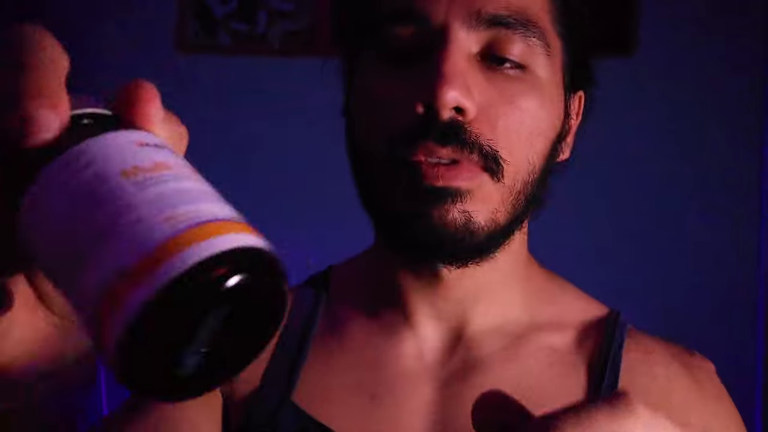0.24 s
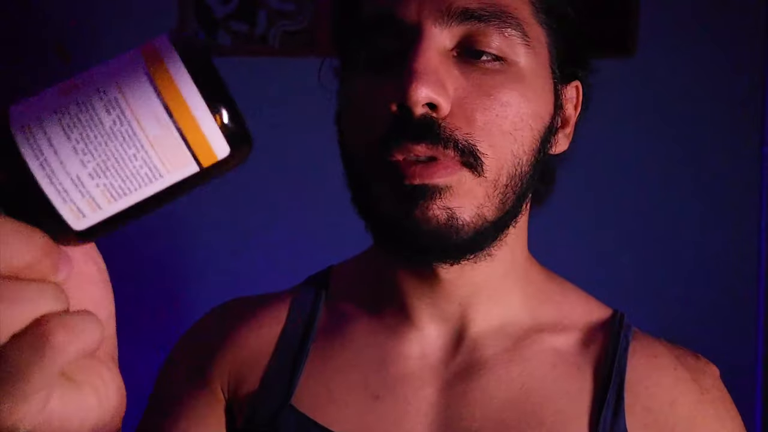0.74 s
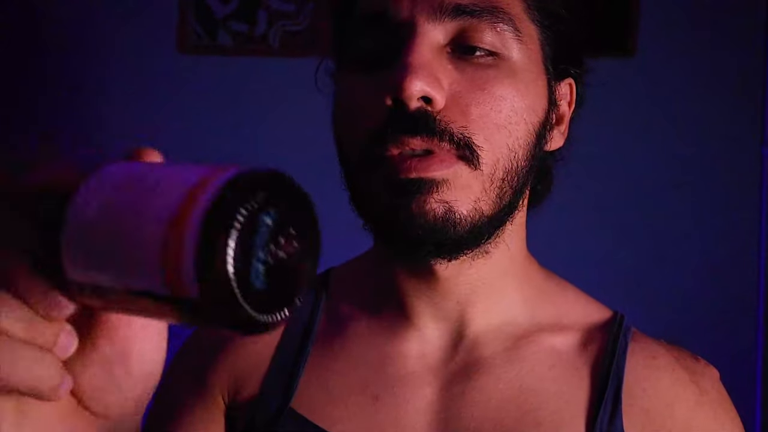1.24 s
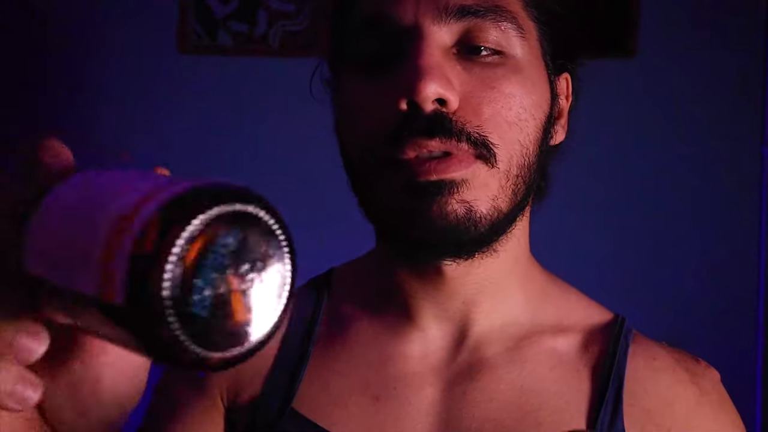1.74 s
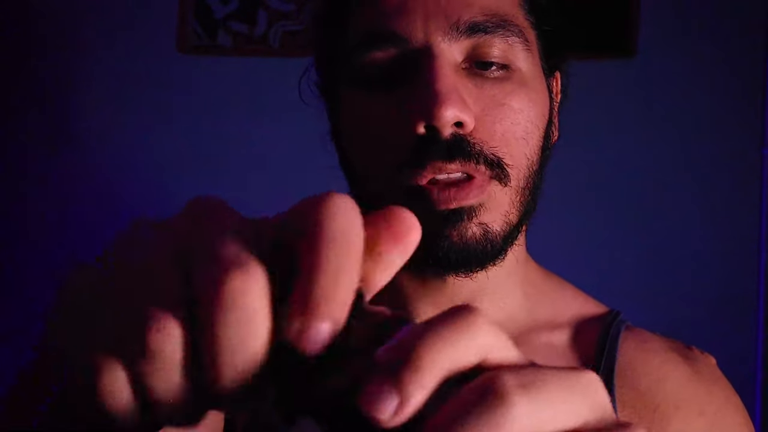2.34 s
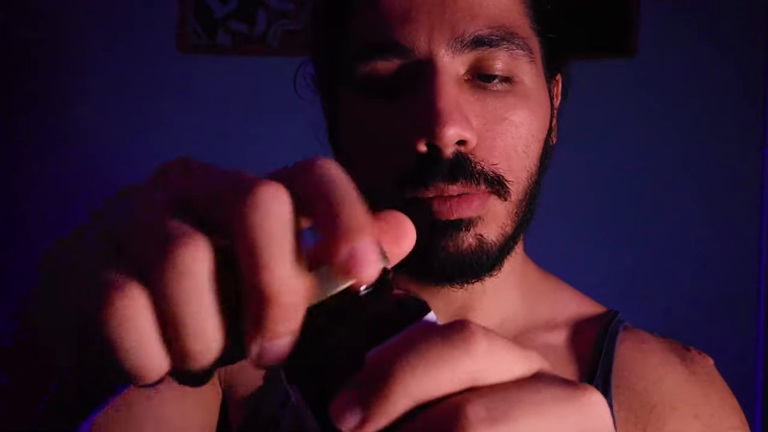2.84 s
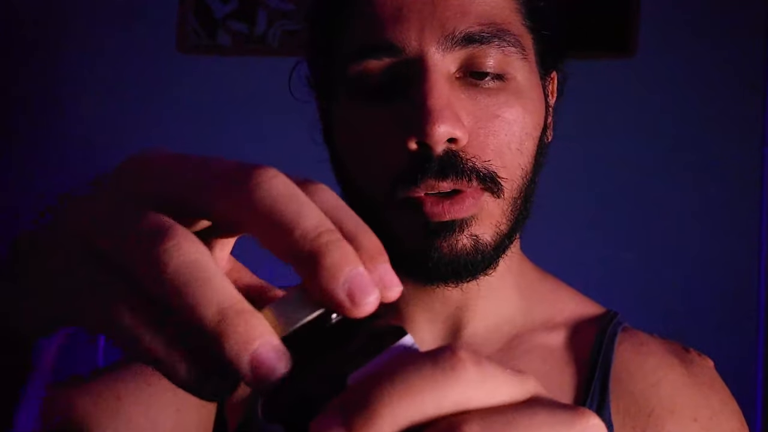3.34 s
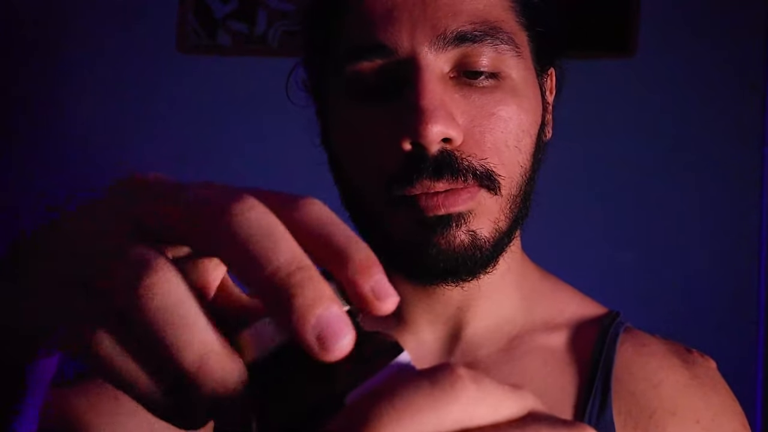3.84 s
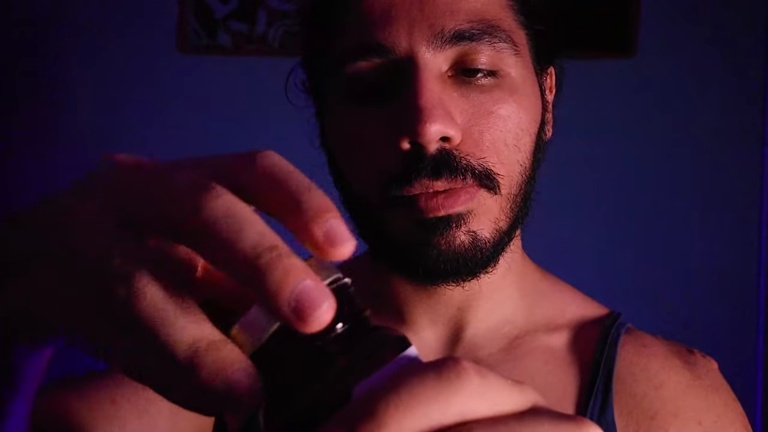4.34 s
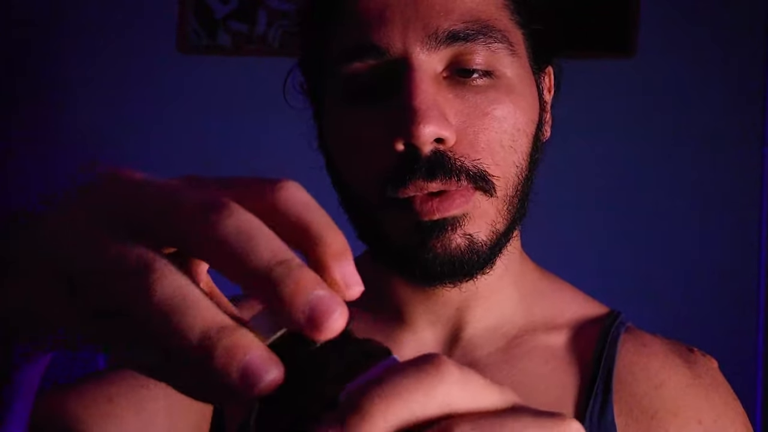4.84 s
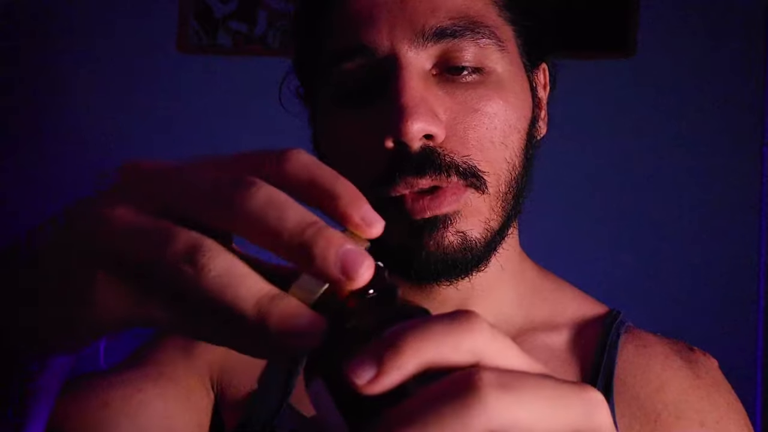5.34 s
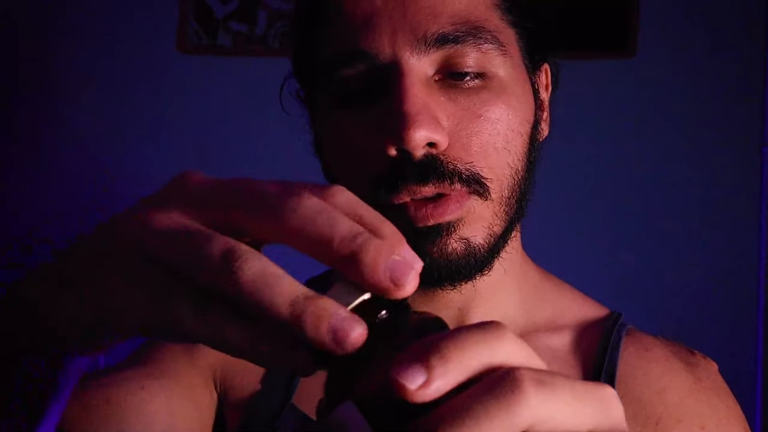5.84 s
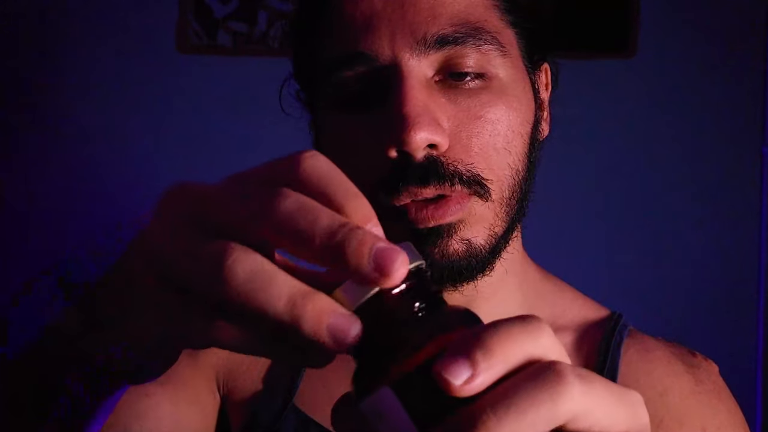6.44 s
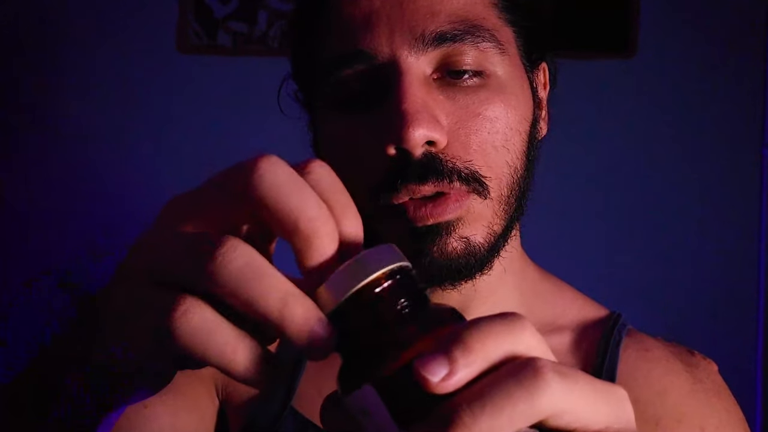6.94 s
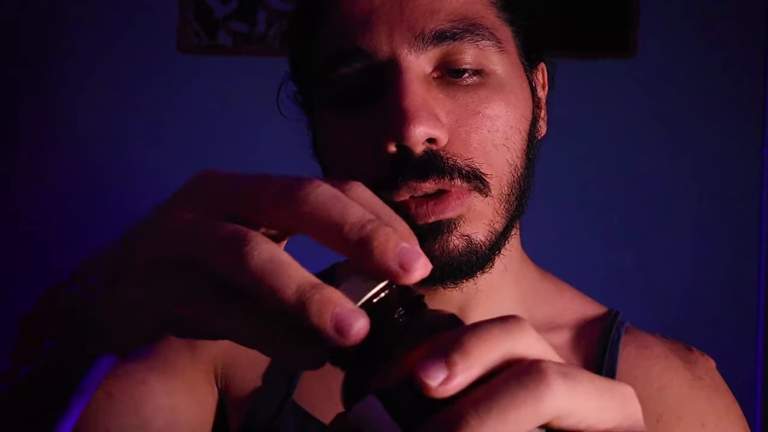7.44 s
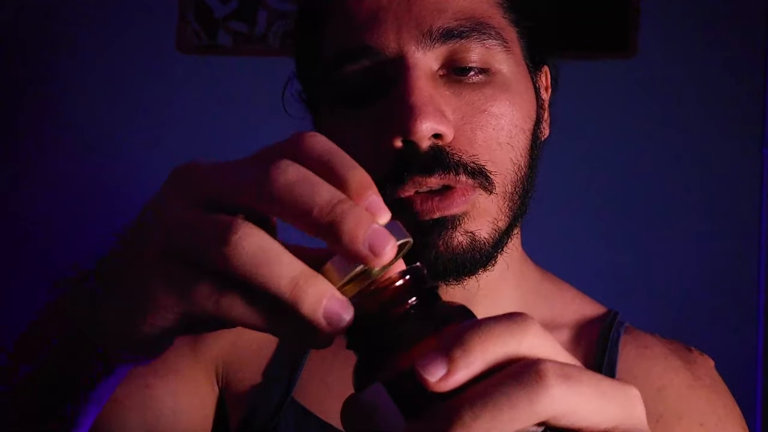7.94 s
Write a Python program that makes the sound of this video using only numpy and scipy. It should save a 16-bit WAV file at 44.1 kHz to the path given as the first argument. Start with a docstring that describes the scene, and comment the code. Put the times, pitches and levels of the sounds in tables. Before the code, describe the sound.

Close stereo handling of a glass pill bottle: crisp tumbling rattle, then gritty unscrewing scrapes, sharp metallic clicks and small hollow neck notes.

```python
"""In a small quiet room a glass pill bottle is tipped to and fro, close to a stereo microphone.
First pills tumble and strike the glass and the closed lid: noise cracks and decaying modes, over soft handling.
Then the metal cap is unscrewed: random catches grind, rasp and hiss on the thread, and clicks thud, clack and ring.
As the cap comes loose its sounds stir a gliding air resonance in the neck, and puffs of air add short sine notes.
Near echoes and scattered room reflections follow each sound; a faint noise floor lies under all of it."""
import sys
import numpy as np
from scipy import signal
from scipy.fft import rfft, irfft
from scipy.io import wavfile
from scipy.ndimage import uniform_filter1d

SR = 44100
rng = np.random.default_rng(int(sys.argv[2]) if len(sys.argv) > 2 else 0)


def to_wav(sig):
    """Store sig (one row per channel, or 1-D mono) as 16-bit WAV at the path in sys.argv[1].

    Samples outside -1..1 are clipped; the rate is SR.
    """
    pcm = np.clip(np.atleast_2d(sig), -1, 1) * 32767
    pcm = np.round(pcm).astype(np.int16)
    wavfile.write(sys.argv[1], SR, pcm.T)  # frames by channels


N = 360738
TIME = np.arange(N) / SR  # seconds


def amp(db):
    """Decibels to gain."""
    return 10 ** (np.asarray(db) / 20)


def evened(x, size=None):
    """Scales to rms 1 over the first size samples (over all, if none is given)."""
    return x / np.sqrt(np.mean(x[..., :size] ** 2) + 1e-20)


def read(points, hz):
    """Reads (Hz, value) points on a log-frequency axis."""
    f, value = np.transpose(points)
    return np.interp(np.log(hz + 1), np.log(f + 1), value)


def add(mix, s, sound):
    """Mixes a stereo sound in at time s."""
    part = mix[:, max(round(s * SR), 0):][:, :sound.shape[1]]
    part += sound[:, :part.shape[1]]


def colour(x, points, size=4096):
    """Causal minimum-phase filter with the given (Hz, dB) shape."""
    log_gain = np.log(amp(read(points, abs(np.fft.fftfreq(size, 1 / SR)))))
    spectrum = np.exp(np.conj(signal.hilbert(log_gain)))
    taps = np.fft.ifft(spectrum).real[:size // 2]
    return signal.fftconvolve(x, taps[None], axes=1)[:, :x.shape[1]]


def pair_noise(size, split_hz, left_db=0):
    """White noise at two microphones: alike well below split_hz, unrelated well above."""
    a, b = rfft(rng.standard_normal((2, size)))
    same = 1 / (1 + (np.fft.rfftfreq(size, 1 / SR) / split_hz) ** 2)
    right = same * a + np.sqrt(1 - same ** 2) * b
    return irfft([a * amp(left_db), right], size)


def ring(modes, size, free=1, uneven_db=3, detune=0.0017):
    """One blow on a set of modes; the spot struck sets how hard each rings and how it faces the microphones."""
    hz, db, t60, left_db = np.transpose(modes)[:, :, None]
    strength, shift, facing = rng.standard_normal((3, len(modes), 1))
    t = np.arange(size) / SR
    dying = amp(db + uneven_db * strength - 60 * t / (t60 * free))
    flip = np.pi * rng.integers(0, 2, (len(modes), 1))
    phase = 2 * np.pi * hz * (1 + detune * shift) * t + flip
    lead = (hz / 4300) ** 2 * (0.67 + facing)  # high modes reach the two sides out of step
    sides = [dying * amp(side * left_db / 2) * np.sin(phase + side * lead) for side in (1, -1)]
    return np.array([modes_heard.sum(0) for modes_heard in sides])


def burst(size, decay, left_db):
    """A contact: a puff of noise dying exponentially, with decay as its time constant in seconds."""
    return pair_noise(size, split_hz=6800, left_db=left_db) * np.exp(-np.arange(size) / SR / decay)


def ticks(rate, spread_db):
    """Random tiny impacts of uneven size, their power steadied over about 50 ms."""
    chance = rng.random(N)
    size = np.minimum(rng.exponential(1, N), 4)
    train = (chance < rate / SR) * amp(spread_db * size) * rng.choice([-1, 1], N)
    return train / np.sqrt(abs(uniform_filter1d(train ** 2, size=2200)) + 1e-4)


# The cap comes free of its seal. Each row: time in seconds, looseness from 0 to 1.
SEAL_LOOSENING = [(3.3, 0.03), (3.8, 0.53)]


def looseness(s):
    """How far the cap is free of its seal: a linear rise, held before and after."""
    return np.clip(np.interp(s, *np.transpose(SEAL_LOOSENING)), 0, 1)


# The quiet room with nothing moving. Each row: frequency in Hz, relative density in dB per Hz.
FLOOR_SPECTRUM = [(18, -37), (30, -0.5), (81, -2), (512, -18), (1500, -19), (1860, -28), (2290, -23),
                  (2900, -26.5), (9970, -36), (13700, -41.5), (16000, -68)]


def quiet_floor(level_db=-58):
    """Steady coloured noise, much the same at both microphones in the low end."""
    return amp(level_db) * evened(colour(pair_noise(N, split_hz=3000), FLOOR_SPECTRUM))


# Deep rumble of the hands. Each row: frequency in Hz, relative density in dB per Hz.
RUMBLE_SPECTRUM = [(15, -38), (35, -14), (55, 9), (80, 9), (130, -25), (300, -39.5)]
# Soft rubbing of the hands. Each row: frequency in Hz, relative density in dB per Hz.
RUBBING_SPECTRUM = [(50, -20.5), (100, 4), (140, 3), (250, -3.5), (380, -4.5), (900, -35)]
# The hands change their grip. Each row: time of the swell's peak in seconds, time to fall to 1/e in seconds,
# deep rumble in dB, soft rubbing in dB.
GRIP_CHANGES = [(.27, 0.2, -50.5, -46.5), (1.07, 0.05, -51, -60), (1.888, 0.036, -42, -74),
                (2.114, 0.13, -47, -50.5), (2.528, 0.096, -50.5, -56), (2.736, 0.08, -51, -38.5),
                (3.31, 0.43, -52, -52), (4.49, 0.21, -62, -52.5), (4.86, 0.091, -58, -43.5),
                (5.522, 0.21, -44, -48.5), (5.706, .022, -28, -36.5), (5.75, 0.19, -42, -47.5),
                (7.262, 0.37, -49, -70), (7.8, 0.27, -43.5, -56), (8.154, .08, -45.5, -47)]


def hands(pills, cap, rumble_db=-36, rubbing_db=-33, tipping_db=-16, holding_db=-66, follow=0.47):
    """Rumble and soft rubbing grow with the work on bottle and cap, and swell at each change of grip."""
    power = (amp(tipping_db) * pills[0]) ** 2 + cap[0] ** 2  # left side
    smooth = abs(uniform_filter1d(uniform_filter1d(power, size=2400), size=1500))
    effort = np.sqrt(smooth + amp(holding_db) ** 2) ** follow
    rumble_gain, rubbing_gain = amp(rumble_db) * effort, amp(rubbing_db) * effort
    for s, half, deep_db, soft_db in GRIP_CHANGES:
        swell = np.exp(-((TIME - s) / half) ** 2)
        rumble_gain = np.hypot(rumble_gain, amp(deep_db) * swell)
        rubbing_gain = np.hypot(rubbing_gain, amp(soft_db) * swell)
    rumble = evened(colour(pair_noise(N, split_hz=56, left_db=2.5), RUMBLE_SPECTRUM, size=16384))
    rubbing = evened(colour(pair_noise(N, split_hz=1000), RUBBING_SPECTRUM, size=8192))
    return rumble_gain * rumble + rubbing_gain * rubbing


# How long the small room rings. Each row: frequency in Hz, 60 dB decay time in seconds.
ROOM_DECAY = [(200, 0.36), (1000, 0.44), (3000, .29), (8000, 0.27), (15000, 0.1)]
# How strongly it answers. Each row: frequency in Hz, level in dB against the direct sound.
ROOM_LEVEL = [(200, 1), (1000, -9), (3000, -7.5), (8000, -9.5), (15000, -5.5)]


def room(x, first_wall=0.0055, size=20000):
    """Scattered reflections of a small room, from first_wall seconds on, each band dying at its own speed."""
    t = np.arange(size) / SR
    taps = pair_noise(size, split_hz=27000) * (rng.random(size) < .12) * (t > first_wall)
    hz, frame_s, z = signal.stft(taps, SR, nperseg=256)
    t60 = read(ROOM_DECAY, hz)[:, None]
    fading = amp(read(ROOM_LEVEL, hz)[:, None] - 60 * frame_s / t60)
    z = z * fading / np.sqrt(t60 * SR / np.log(1e6))  # a long decay gains no extra energy
    tail = signal.istft(z, SR, nperseg=256)[1] / taps.std()
    return signal.oaconvolve(x, tail, axes=1)[:, :N]


# Reflections off the hands and the chest. Each row: delay in seconds, gain as a factor.
NEAR_REFLECTIONS = [(.0029, 0.037), (.0046, 0.11), (.0073, 0.087), (0.0103, 0.16)]


def near_echoes(x):
    """A few reflections from close by, reaching the two sides up to four samples apart."""
    out = np.zeros((2, N))
    for delay, gain in NEAR_REFLECTIONS:
        apart = rng.integers(-4, 5)
        add(out, delay, gain * np.array([x[0], np.roll(x[1], apart)]))
    return out


# Puffs of air as the cap lifts or drops; the wider the gap, the higher the note.
# Each row: start in seconds, note in Hz, level in dB, 60 dB decay time in seconds.
AIR_PUFFS = [(4.136, 598, -44, 0.19), (4.494, 541, -37, 0.25), (5.014, 518, -35, 0.21),
             (5.308, 670, -43.5, 0.061), (7.634, 495, -18, 0.1), (7.804, 615.5, -27.5, 0.17),
             (8.097, 625, -18.5, 0.22)]


def neck_air(x, tight_hz=263, loose_hz=359, lift_s=0.16, width_hz=60, db=-1):
    """Clicks and scrapes stir the air resonance, which rises as the cap loosens and shifts near each lift."""
    hz = tight_hz + (loose_hz - tight_hz) * looseness(TIME)
    for s, lifted_hz, _, _ in AIR_PUFFS:
        hz = hz + (lifted_hz - hz) * np.exp(-((TIME - s) / lift_s) ** 2)
    # shift the moving note down to 0 Hz, keep a narrow band there, shift it back
    turn = np.exp(2j * np.pi * np.cumsum(hz) / SR)
    r = np.exp(-np.pi * width_hz / SR)
    narrow = signal.lfilter([1 - r], [1, -r], x.mean(0) / turn + 1e-18)
    return amp(db) * 2 * (turn * narrow).real


def neck_notes():
    """The air under the cap rings like a blown bottle: a dying sine, alike at both microphones."""
    out, t = np.zeros((2, N)), np.arange(SR // 2) / SR
    for s, hz, db, t60 in AIR_PUFFS:
        note = amp(db - 60 * t / t60) * np.sin(2 * np.pi * hz * t)
        add(out, s, np.tile(note, (2, 1)))
    return out


# The loosened metal cap, before the fingers damp it. Each row: mode in Hz, relative level in dB,
# 60 dB decay time in seconds, left minus right in dB.
CAP_MODES = [(1390, -1, .09, 0), (1490, -7, .09, 0), (2350, 0, .16, 2), (2410, -5, .08, 2),
             (2750, -12, .04, 2), (3510, -6, .17, 3), (4010, -8, .09, 9), (4110, -3, .13, 11),
             (4900, -13, .06, 3), (5810, -4, .14, -3), (5900, -10, .09, -2), (6520, -12, .07, 3),
             (7800, -8, .08, 7), (8410, -14, .08, 5), (9900, -16, .05, 4), (11020, -22, .08, 1)]
# Grinding on the thread. Each row: frequency in Hz, relative density in dB per Hz.
GRIND_SPECTRUM = [(120, -59), (280, -4.5), (450, -3), (800, -1), (1250, 4), (1330, -1.5), (1375, 9),
                  (1430, 9.5), (1550, -3.5), (1820, -51), (2350, 1), (2900, -44), (4000, -31.5)]
# Hissing on the thread. Each row: frequency in Hz, relative density in dB per Hz.
HISS_SPECTRUM = [(2500, -26.5), (4200, 14), (5000, 13.5), (6600, 14), (8500, 1.5), (10000, 12),
                 (12500, -32), (16000, -46)]
# Pushes of the cap round its thread; a row that ends before it starts is all but silent.
# Each row: start in seconds, end in seconds, grinding in dB, rasp in dB, rasp centre in Hz, hiss in dB.
CAP_TURNS = [(2.627, 2.70, -44.5, -35.5, 2300, -43), (2.738, 2.807, -36.5, -45.5, 2600, -56.5),
             (2.874, 2.87, -35.5, -44.5, 2400, -49), (2.932, 2.966, -44, -67, 2400, -70),
             (3.003, 3.233, -33.5, -39.5, 3170, -55), (3.256, 3.374, -34, -37, 2480, -54.5),
             (3.463, 3.47, -52, -55.5, 3860, -69), (3.913, 3.997, -40.5, -43.5, 2510, -56.5),
             (4.032, 4.19, -67, -58, 2650, -53.5), (4.265, 4.254, -31, -33, 2440, -48),
             (4.651, 4.672, -50.5, -52, 2160, -70), (5.039, 5.078, -56, -52, 2530, -61),
             (5.479, 5.492, -43.5, -55, 2400, -64), (5.663, 5.747, -41.5, -46.5, 4340, -65),
             (5.918, 6.016, -44.5, -50, 2150, -54.5), (6.077, 6.173, -46.5, -47.5, 2500, -56),
             (6.19, 6.385, -41, -51.5, 2400, -61), (6.361, 6.392, -40, -43, 1980, -51.5),
             (7.096, 7.197, -50.5, -56, 2400, -56), (7.354, 7.476, -44.5, -48, 2200, -55),
             (7.503, 7.532, -47, -49.5, 2400, -55.5)]


def thread_scrape(rasp_db=-1, metal_db=-2, rasp_q=2.0, uneven_db=2.32, tight_ring=0.34,
                  ease_share=0.16, release_s=.014, swell_db_per_s=21):
    """Stick and slip on the thread: dense little catches that grind, rasp, hiss and keep the cap ringing."""
    catch_decay = np.exp(-1 / (.0007 * SR))  # 0.7 ms
    catches = signal.lfilter([1], [1, -catch_decay], abs(ticks(rate=900, spread_db=3)))
    slips = evened(pair_noise(N, split_hz=7000, left_db=2) * (evened(catches) + .6))
    grinding, hissing = evened(colour(slips, GRIND_SPECTRUM)), evened(colour(slips, HISS_SPECTRUM))
    wander = uniform_filter1d(uniform_filter1d(rng.standard_normal(N), size=600), size=400)
    unsteady = amp(uneven_db * evened(wander))
    out, stirring = np.zeros((2, N)), np.zeros(N)
    for start, end, grind, rasp, rasp_hz, hiss in CAP_TURNS:
        ease = ease_share * (end - start)
        span = slice(round((start - ease) * SR), round((end + 6 * release_s) * SR))
        t = TIME[span]
        attack = np.clip((t - start + ease) / (2 * ease), 0, 1)
        bearing_down = amp(swell_db_per_s * np.minimum(t - end, 0))
        release = np.exp(-np.maximum(t - end, 0) / release_s)
        pressure = unsteady[span] * attack * bearing_down * release
        edges_hz = rasp_hz * np.exp(np.array([-.5, .5]) / rasp_q)
        band = signal.butter(2, edges_hz, "band", fs=SR, output="sos")
        rasping = amp(rasp_db) * evened(signal.sosfilt(band, slips[:, span]))
        scrape = amp(grind) * grinding[:, span] + amp(rasp) * rasping + amp(hiss) * hissing[:, span]
        out[:, span] += pressure * scrape
        stirring[span] += pressure * amp(rasp)
    # a tight cap hardly rings; once loosened, the scraping sets its lower modes going
    freedom = tight_ring + (1 - tight_ring) * looseness(TIME)
    modes = colour(ring(CAP_MODES, size=6000, free=.6, uneven_db=0), [(3500, 0), (8000, -9)], size=256)
    modes = modes / np.linalg.norm(modes) * np.sqrt(2)
    metal = signal.oaconvolve(slips * stirring * freedom, modes, axes=1)[:, :N]
    return out + amp(metal_db) * metal


# Contact of cap and glass thread. Each row: frequency in Hz, relative density in dB per Hz.
CONTACT_SPECTRUM = [(80, -18), (330, 15.5), (750, 6.5), (1380, 5.5), (1850, -12), (2600, -3), (4200, -15.5),
                    (7500, -14), (10500, -23.5), (12300, -24), (16000, -9)]
# Edges in Hz of five registers: thud, clack, then low, middle and high ring.
CLICK_EDGES_HZ = [150, 900, 1900, 3000, 4800, 16000]
# Centres in Hz of the same five registers.
CLICK_CENTRES_HZ = [500, 1400, 2400, 3800, 6500]
# Weight of the low, middle and high ring. Each row: dB with the cap tight, dB with it loose.
RING_WEIGHTS = [(-2, 5.5), (1.5, -2), (-1.5, 3)]
# Treble fall of the clicks. Each row: frequency in Hz, gain in dB.
CLICK_TREBLE_FALL = [(5000, 0), (8500, 0.5), (12000, -3), (16000, -14)]
# The cap knocks on the neck; levels stand before the ring weights and the treble fall.
# Each row: start in seconds, ring in dB, ring brightness in dB per octave, thud in dB, clack in dB,
# free ringing as a factor on the decay times (never below 0.02 in use).
NECK_CLICKS = [(2.5828, -47, 17, -64, -59.5, 0.017), (2.6711, -36, -4, -46, -27.5, 0.09),
               (2.7045, -34, -4.5, -38, -34, 0.043), (2.7657, -33, -8.5, -37, -38, 0.042),
               (2.7735, -52, -12, -51, -47, .15), (2.8744, -32, -10.5, -38.5, -28, 0.12),
               (2.938, -40.5, -16, -54, -29.5, 0.14), (3.1922, -37.5, -1.5, -59, -44, 0.12),
               (3.4853, -44.5, -13, -47.5, -46, 0.19), (3.7352, -42, -7, -41.5, -38, 0.26),
               (3.7809, -29.5, 0.5, -38, -23, 0.29), (3.9312, -46, -6, -43, -38, 0.67),
               (4.0296, -43, -19, -43.5, -44, 0.33), (4.0672, -41.5, -2.5, -43, -49, .67),
               (4.135, -34.5, -1, -46.5, -35, 0.056), (4.242, -39.5, -7, -47, -47, .79),
               (4.2541, -32.5, -4.5, -40, -30, 0.29), (4.4939, -32.5, 5, -41.5, -40, 0.48),
               (4.6725, -37, 0.5, -43, -36.5, 0.35), (4.682, -41, -11, -43.5, -57, 0.31),
               (4.702, -44, -8, -43.5, -43, 0.15), (4.797, -44.5, 2, -44.5, -40, 0.25),
               (4.8749, -42.5, 0.5, -64, -31.5, 0.12), (5.0148, -56.5, 7, -49.5, -58, 0.14),
               (5.0463, -39, -1, -43.5, -50.5, 0.17), (5.1208, -53, -12, -58.5, -71, 0.41),
               (5.4826, -43.5, -4.5, -42.5, -38, 0.42), (5.6944, -32, 5.5, -23.5, -25.5, 0.29),
               (6.169, -36, 2, -37, -37, 0.38), (6.174, -27.5, -1.5, -27.5, -28, 0.29),
               (6.2733, -55, -3, -54, -38, 0.45), (6.291, -49, -7, -29, -65, 0.18),
               (6.8136, -49.5, 1, -62.5, -56.5, 0.32), (6.944, -53, -1, -59.5, -59, .11),
               (7.0777, -42, -15.5, -47, -48, 0.4), (7.1158, -36, -4.5, -37, -44, 0.085),
               (7.18, -35, 2, -36, -23.5, 0.14), (7.2601, -36.5, 1, -35, -30, 0.52),
               (7.44, -43, 4.5, -53, -44, .23), (7.6252, -28, -1.5, -34, -37, 0.35),
               (7.639, -37, -27, -44, -37, 0.32), (7.6537, -42, 5, -41, -31, 0.19),
               (7.8036, -29.5, -1, -47, -36, 0.94), (8.097, -41.5, -4, -35, -31.5, 0.25)]


def cap_clicks(contact_db=1, pivot_hz=2900, size=13000):
    """The cap thuds, clacks and rings, each click with its own brightness; the fingers damp it more or less."""
    first = 441  # samples: 10 ms, over which levels are set
    out, hz = np.zeros((2, N)), np.fft.rfftfreq(first, 1 / SR)
    tight_db, loose_db = np.transpose(RING_WEIGHTS)
    octaves = np.log2(np.array(CLICK_CENTRES_HZ[2:]) / pivot_hz)
    for s, db, brightness, thud_db, clack_db, free in NECK_CLICKS:
        contact = colour(burst(size, decay=0.0033, left_db=1.5), CONTACT_SPECTRUM, size=1024)
        metal = ring(CAP_MODES, size, free=max(free, .02), uneven_db=2.5, detune=.003)
        contact = amp(contact_db) * evened(contact, size=first)
        metal = min(free + .5, 1) * evened(metal, size=first)
        click = evened(contact + metal, size=first)
        ring_db = db + brightness * octaves + tight_db + looseness(s) * (loose_db - tight_db)
        register_db = np.r_[thud_db, clack_db, ring_db]
        # weigh each register by the power it already holds
        power = (abs(rfft(click[:, :first])) ** 2).mean(0)
        share = np.histogram(hz, CLICK_EDGES_HZ, weights=power)[0] / power.sum()
        weights = np.c_[CLICK_CENTRES_HZ, register_db - 10 * np.log10(share)]
        add(out, s, colour(click, weights, size=512))
    return colour(out, CLICK_TREBLE_FALL, size=256)


# Crack of pill on pill. Each row: frequency in Hz, relative density in dB per Hz.
CRACK_SPECTRUM = [(100, -23), (400, -11), (750, -5.5), (1200, 5.5), (1800, 6), (3000, 0), (4800, -6),
                  (7500, -5), (10000, -14.5), (12000, -32), (16000, -30)]
# The glass wall. Each row: mode in Hz, relative level in dB, 60 dB decay time in seconds,
# left minus right in dB.
GLASS_MODES = [(6530, -4.5, .07, -2.5), (6603, -19.5, 0.043, 17), (6770, 2.5, 0.018, 8),
               (7000, -19, 0.038, 10), (8725, -4.5, 0.035, -5.5), (8640, 0, 0.02, 6.5),
               (10060, -19.5, .025, 4.5), (13300, -20, 0.17, 1)]
# Each tip of the bottle sets the heap sliding, then it settles. Each row: time at its strongest in seconds,
# level in dB before the clatter and glass shares, rise from 1/e in seconds, 60 dB settling time in seconds.
HEAP_SLIDES = [(0.047, -34.5, 0.0146, 0.43), (.082, -22.5, .012, .15), (0.176, -20.5, 0.016, 0.3),
               (0.307, -17.5, 0.031, 0.14), (.41, -34, 0.019, 0.34), (.63, -41, 0.019, 0.049),
               (.85, -22.5, .04, 0.31), (1.001, -22, 0.014, 0.23), (1.07, -29, 0.022, 0.2),
               (1.25, -33.5, 0.052, 0.94), (1.334, -27.5, 0.028, 0.4), (1.548, -39.5, .04, 0.21),
               (1.717, -39, 0.049, 0.13), (1.886, -32, 0.032, 0.12), (2.01, -37.5, 0.046, 0.69),
               (2.11, -27.5, 0.051, 0.31)]


def pill_tumble(clatter_db=-6, glass_db=-7, glass_growth=1.07, count=10):
    """Hundreds of small collisions a second over several spots on the wall; hard slides ring the glass more."""
    train = ticks(rate=560, spread_db=4)
    spot = rng.integers(0, count, N)
    end = round(max(s + settle for s, _, _, settle in HEAP_SLIDES) * SR)
    motion = np.zeros(end)
    for s, db, rise, settle in HEAP_SLIDES:
        t = TIME[:end] - s
        rising = np.exp(-(np.minimum(t, 0) / rise) ** 2)
        settling = amp(db - 60 * np.maximum(t, 0) / settle)
        motion = np.hypot(motion, settling * rising)
    ringing = motion.max() * (motion / motion.max()) ** glass_growth
    out = np.zeros((2, N))
    for k in range(count):
        snap = colour(burst(1024, decay=.0006, left_db=3), CRACK_SPECTRUM, size=1024)
        clink = ring(GLASS_MODES, size=2400, uneven_db=3, detune=.005)
        for sound, gain in (snap, amp(clatter_db) * motion), (clink, amp(glass_db) * ringing):
            hits = (train * (spot == k))[None, :end] * gain
            unit_sound = sound / np.linalg.norm(sound) * np.sqrt(2)
            add(out, 0, signal.oaconvolve(hits, unit_sound, axes=1))
    return out


# The lid screwed tight and held. Each row: mode in Hz, relative level in dB,
# 60 dB decay time in seconds before a common shortening, left minus right in dB.
TIGHT_LID_MODES = [(2013, -3, 0.13, -0.5), (2175, -7.5, 0.15, -5), (2238, 3, 0.039, -3.5),
                   (2400, -9.5, 0.032, -12), (2470, -6, 0.069, 5), (2766, 3, 0.014, 0),
                   (3190, -9, 0.023, 2)]
# A pill strikes the glass wall. Each row: start in seconds, level in dB before the shares of each part.
WALL_HITS = [(.0718, -21.5), (.0803, -29), (.0858, -22.5), (.164, -31), (.1825, -21.5), (.1987, -21),
             (.2745, -26.5), (.2955, -18.5), (.3037, -19), (.3121, -15.5), (.4112, -31.5), (.4558, -30),
             (.5079, -36.5), (.6303, -43.5), (.8322, -33), (.8732, -25.5), (.8567, -21), (.9513, -19),
             (.9817, -22.5), (.9942, -32), (1.0131, -27.5), (1.0409, -24), (1.0541, -17.5), (1.0794, -26),
             (1.1876, -43), (1.2238, -36), (1.3254, -33), (1.3378, -31), (1.5236, -32.5), (1.5657, -31),
             (1.6898, -39.5), (1.8505, -30.5), (1.8785, -25), (2.0133, -37), (2.0192, -30.5),
             (2.0853, -27.5), (2.0984, -29), (2.1603, -35), (2.1784, -39), (2.2682, -43)]
# A pill knocks on the closed lid. Each row: start in seconds, level in dB before the shares of each part.
LID_HITS = [(.164, -26), (.2955, -29), (.817, -24), (.8251, -13.5), (.8322, -24), (.8432, -16.5),
            (.849, -21.5), (.8567, -13.5), (.8732, -19), (1.2561, -22.5), (1.275, -20.5), (1.8889, -28)]


def pill_landings(glass_db=1.5, wall_crack_db=-7, wall_lid_db=-18, lid_db=-1, lid_crack_db=-13, lid_glass_db=-17):
    """Each landing cracks and rings the part it strikes; the other part answers faintly."""
    first = 176  # samples: 4 ms, over which levels are set
    out = np.zeros((2, N))
    on_wall = WALL_HITS, wall_crack_db, glass_db, wall_lid_db
    on_lid = LID_HITS, lid_crack_db, lid_glass_db, lid_db
    for hits, crack_share, glass_share, lid_share in (on_wall, on_lid):
        for s, db in hits:
            snap = colour(burst(1024, decay=.0007, left_db=3), CRACK_SPECTRUM, size=1024)
            clink = ring(GLASS_MODES, size=2400, uneven_db=3, detune=.004)
            knock = ring(TIGHT_LID_MODES, size=2400, free=.8, detune=.03)
            add(out, s, amp(db + crack_share) * evened(snap, size=first))
            add(out, s, amp(db + glass_share) * evened(clink, size=first))
            add(out, s, amp(db + lid_share) * evened(knock, size=first))
    return out


def scene():
    """Bottle and cap in the room, over the hands and a quiet floor."""
    pills = pill_landings() + pill_tumble()
    cap = cap_clicks() + thread_scrape()
    bottle = pills + cap + neck_air(cap) + neck_notes()
    return bottle + near_echoes(bottle) + room(bottle) + hands(pills, cap) + quiet_floor()


# A gentle fall of the highest treble over the whole sound. Each row: frequency in Hz, gain in dB.
TREBLE_FALL = [(10000, -1.5), (13500, -7), (16000, -12)]


def record(dry, cutoff_hz=16400):
    """A gentle fall of the highest treble over the whole sound, then the recorder's band limit."""
    heard = colour(dry, TREBLE_FALL, size=256)
    band_limit = signal.firwin(511, cutoff_hz, window=("kaiser", 9), fs=SR)
    return signal.oaconvolve(heard, band_limit[None], "same")


dry = scene()
out = record(dry)
to_wav(out)
```